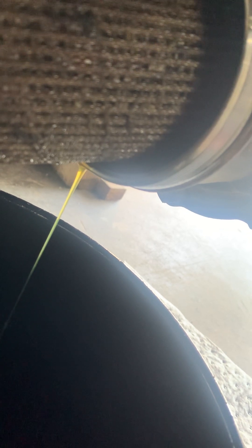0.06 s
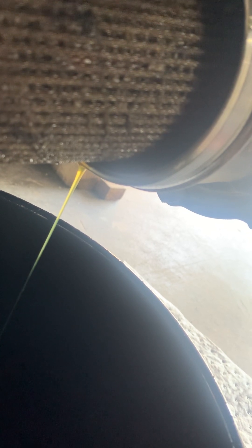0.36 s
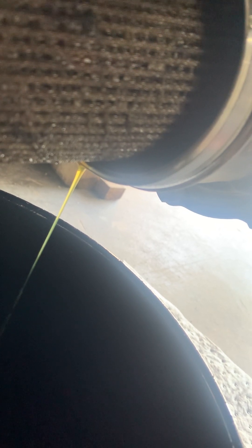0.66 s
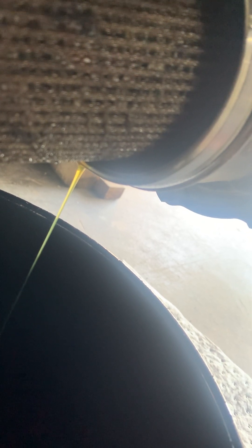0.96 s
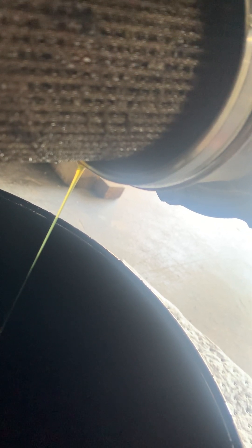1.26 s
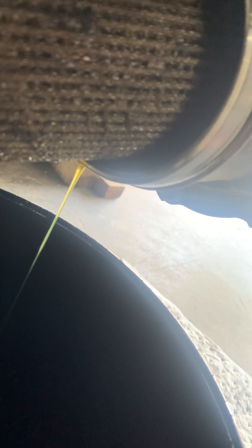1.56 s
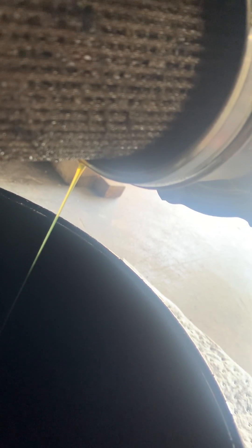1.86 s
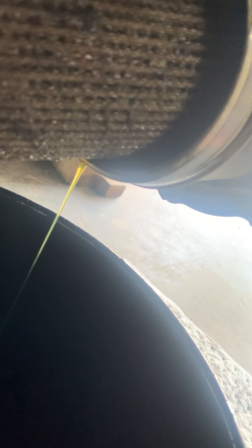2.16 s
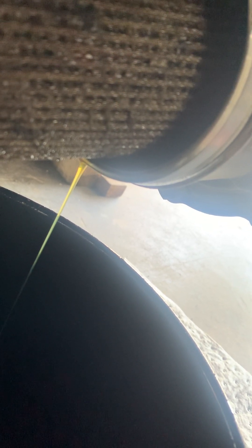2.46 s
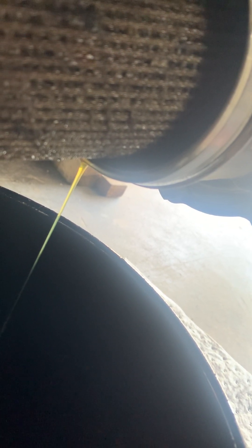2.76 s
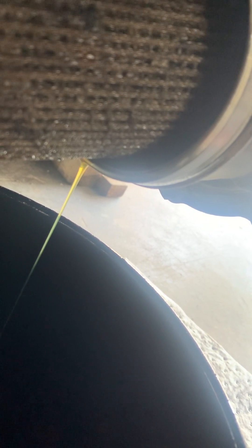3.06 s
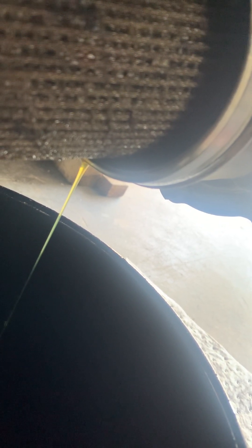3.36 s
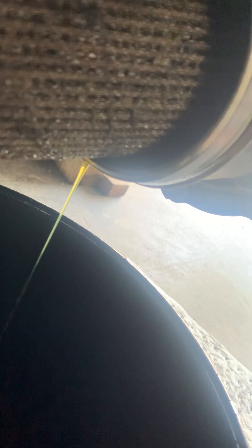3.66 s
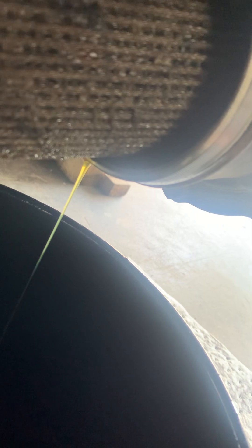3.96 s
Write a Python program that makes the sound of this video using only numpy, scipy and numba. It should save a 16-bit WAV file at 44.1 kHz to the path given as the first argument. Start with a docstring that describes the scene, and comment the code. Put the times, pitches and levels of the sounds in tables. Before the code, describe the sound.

Oil trickling into a part-filled pan with small bubbling blips, over a faint machine hum.

```python
"""At a part-filled plastic drain pan, microphone close, a machine humming in the distance.
A thin stream of oil falls in and traps air: bubbles blip in uneven clusters over a fine trickle,
now and then they gurgle, and froth pops on the surface. The hollow of the pan rings with all of it.
Early on comes a brief, dry, centred glitch: a blip falling in pitch over a low thump."""
import sys
import numpy as np
from scipy import signal
from scipy.fft import rfft, irfft
from scipy.io import wavfile
from scipy.ndimage import uniform_filter1d
from numba import njit

SR = 44100
rng = np.random.default_rng(int(sys.argv[2]) if len(sys.argv) > 2 else 0)


def generate_wav(sig):
    """Save sig (samples, or channels by samples) to the path in sys.argv[1] as 16-bit PCM at SR."""
    pcm = np.round(np.clip(np.atleast_2d(sig).T, -1, 1) * 32767).astype(np.int16)
    wavfile.write(sys.argv[1], SR, pcm)


N = 176400


def undb(db):
    """Decibels to gain."""
    return 10 ** (np.asarray(db) / 20)


def curve(table, column=1):
    """A column of a timed table, joined by straight lines."""
    rows = np.array(table)
    return np.interp(np.arange(N) / SR, rows[:, 0], rows[:, column])


def colour(x, points):
    """Filter by points of (frequency [Hz], gain [dB])."""
    hz, db = np.array(points).T
    f = np.maximum(np.fft.rfftfreq(2 * N, 1 / SR), 1)
    gain = undb(np.interp(np.log(f), np.log(hz), db))
    return irfft(rfft(x, 2 * N) * gain)[..., :N]


def walk(rate_hz):
    """Smooth random drift with a spread near 1."""
    hold = int(SR / rate_hz)
    steps = rng.standard_normal(400)[np.arange(N) // hold]
    return 1.3 * uniform_filter1d(uniform_filter1d(steps, hold), hold)


@njit
def grains(times, hz, gain, cycles, rise, swell):
    """Sines that build over `swell` cycles; over `cycles` they fade 60 dB and go sharp by `rise`."""
    out = np.zeros(N)
    for k in range(len(times)):
        f = min(hz[k], 15000.)
        start = int(times[k] * SR)
        for i in range(int(cycles * SR / f)):
            if 0 <= start + i < N:
                cycle = i * f / SR
                envelope = (1 - np.exp(-(cycle / swell) ** 2)) * np.exp(-6.9 * cycle / cycles)
                phase = 2 * np.pi * cycle * (1 + rise * cycle / cycles / 2)
                out[start + i] += gain[k] * envelope * np.sin(phase)
    return out


def blips(times, hz, db, cycles, swell, rise=0.033):
    """Damped, rising sines, the way pockets of air ring."""
    columns = np.broadcast_arrays(times, hz, undb(db))
    times, hz, gain = (np.array(column, float).ravel() for column in columns)
    return grains(times, hz, gain, float(cycles), float(rise), float(swell))


# how much the microphone's two ports differ (frequency [Hz], gain [dB])
PORT_DIFFERENCE = [(60, -46.5), (200, -62), (380, -37.5), (650, -15), (1100, 3), (4000, 4), (15000, -3)]
def stereo_side(x):
    """The difference between the ports: treble, a quarter cycle ahead, as the left port is nearer."""
    return -signal.hilbert(colour(x, PORT_DIFFERENCE)).imag


# spectrum of the far rumble (frequency [Hz], relative level [dB])
RUMBLE_SPECTRUM = [(20, -33), (33, -17.5), (48, 4.5), (60, -2.5), (85, 4.5), (110, 1.5), (145, -5.5),
                   (185, -0.5), (255, -1.5), (310, -16.5), (550, -17.5), (800, -21), (1700, -39.5),
                   (3000, -38.5), (7000, -45.5), (9000, -60), (11000, -48.5), (16000, -63.5)]
# tones of the hum (frequency [Hz], level offset [dB])
HUM_TONES = [(60.4, -3), (121, -11), (173, -6.5)]
# course of the lowest tone (time [s], level [dB])
LOW_HUM_LEVEL = [(0, -56.5), (1.2, -57), (2.3, -68), (2.5, -47.5), (3.3, -47.5), (4, -49.5)]
def machine():
    """Far off, a machine's hum wavers in a slowly growing rumble; gives mid and side."""
    rumble_db, growth_db_per_s = -54.5, 1.0
    waver, flutter_db, overtone_db = 0.0276, 2.2, -53.5
    t = np.arange(N) / SR
    rumble = colour(rng.standard_normal((2, N)), RUMBLE_SPECTRUM)
    rumble *= undb(rumble_db + growth_db_per_s * t) / np.std(rumble[0])
    hum = 0
    for k, (hz, offset_db) in enumerate(HUM_TONES):
        phase = 2 * np.pi * np.cumsum(hz * (1 + waver * walk(11))) / SR
        db = (overtone_db if k else curve(LOW_HUM_LEVEL)) + offset_db + flutter_db * walk(11)
        hum = hum + np.sqrt(2) * undb(db) * np.sin(phase)
    return rumble[0] + hum, stereo_side(rumble[1])


# strength of the stream where it lands (time [s], level [dB])
FLOW_LEVEL = [(0, -56.5), (.75, -57), (.95, -55), (1.33, -54.5), (1.58, -56.5), (1.9, -52.5), (2.03, -52),
              (2.3, -48.5), (2.55, -54.5), (3.1, -51.5), (3.3, -55.5), (3.6, -48.5), (4, -58.5)]
def trickle(count, centre_hz, spread_oct, offset_db, scatter_db, cycles):
    """Small bubbles ring throughout, their loudness following the flow."""
    t = (np.arange(count) + 3 * rng.random(count) - 1) / count * N / SR
    pitch, loudness = np.clip(rng.standard_normal((count, 2)).T, -2.2, 2.2)
    db = np.interp(t, *np.array(FLOW_LEVEL).T) + offset_db + scatter_db * loudness
    return blips(t, centre_hz * 2 ** (spread_oct * pitch), db, cycles, swell=cycles / 10)


# air trapped by the stream (time [s], relative level [dB], pitch [Hz], relative fizz level [dB])
TRAPPED_BUBBLES = [(0.0013, -43, 1960, -78), (0.0652, -33, 1460, -56), (0.0682, -35.5, 1455, -73),
                   (0.1257, -44, 2340, -99), (0.164, -43, 1335, -73), (0.2024, -36, 2350, -56),
                   (0.2447, -41, 1960, -71), (0.2836, -45.5, 1826, -61), (0.4201, -34, 1645, -53.0),
                   (0.4602, -39.5, 1840, -60), (0.508, -44, 1430, -75), (0.5397, -33, 1940, -68.0),
                   (0.551, -38, 1910, -71.0), (0.5634, -41, 1820, -63.0), (0.5837, -35.5, 2040, -58),
                   (0.623, -43, 2920, -50), (0.6713, -34, 1784, -47), (0.7381, -38.5, 1607, -62.5),
                   (0.8257, -48, 3300, -56.5), (0.8446, -43, 2050, -79), (0.8872, -43, 2850, -69),
                   (0.8973, -45, 1910.0, -60), (0.905, -44, 2960, -70), (0.9207, -41.5, 1940, -54),
                   (0.9333, -34, 2230, -49), (0.954, -56, 2950, -56.0), (0.9725, -32, 2700.0, -48.5),
                   (1.0026, -59, 2380, -53), (1.0134, -33.5, 1700, -65), (1.0246, -36.5, 1660, -48),
                   (1.0889, -34.5, 1675, -57.5), (1.157, -45, 2420, -82), (1.1713, -39.5, 1930.0, -54.5),
                   (1.218, -49, 3250, -53), (1.4, -39, 4470, -48.5), (1.4441, -34.5, 1390, -47),
                   (1.4773, -34.5, 1390.0, -52), (1.4984, -33.5, 1454, -72), (1.6308, -45, 3450, -51),
                   (1.6391, -40, 1960, -73), (1.6836, -40.5, 1580, -49.5), (1.7181, -36.5, 1400, -50.5),
                   (1.8284, -40, 1680, -44.5), (1.8569, -36, 1570, -50.5), (1.8792, -38, 1700, -50.5),
                   (1.919, -30, 1530, -54), (1.9468, -37, 1990, -76), (1.955, -37.5, 2280, -80),
                   (1.994, -39, 1770, -58), (2.0724, -36, 1830, -49), (2.0821, -33, 1700, -68),
                   (2.154, -37.5, 4440, -53), (2.2152, -39, 1890, -55), (2.233, -45, 1940, -49),
                   (2.2432, -46, 1800, -62), (2.2542, -31.5, 1470.0, -46), (2.3261, -33, 1835, -55),
                   (2.3573, -34, 1790, -54), (2.3685, -39, 1730, -48), (2.453, -39.5, 1420, -43),
                   (2.4989, -41.5, 1600.0, -54.5), (2.5147, -39, 2040, -54), (2.58, -37.5, 1500, -54),
                   (2.5929, -31.5, 3340, -54), (2.6314, -38.5, 1840, -53), (2.6884, -35.5, 1556, -53),
                   (2.7023, -47, 1600, -63), (2.706, -41, 3440, -70), (2.746, -38.5, 1940.0, -56),
                   (2.759, -35, 1860.0, -60), (2.77, -41.5, 4200, -47.5), (2.787, -44, 3640, -62),
                   (2.8324, -34.5, 1763, -62), (2.8893, -39.5, 1490, -53), (2.954, -40, 1400, -51),
                   (2.999, -40, 1940, -71), (3.0178, -36.5, 1570, -50), (3.0618, -41, 2010, -73),
                   (3.0794, -32, 1930, -53), (3.0888, -34.5, 2450, -68), (3.128, -39, 2150, -69),
                   (3.1461, -36.5, 2160, -73), (3.1783, -35.5, 1810, -49.5), (3.2292, -34.5, 1780, -67),
                   (3.2787, -40, 1445, -54), (3.3627, -42, 1640, -50.5), (3.3974, -39, 2090, -62),
                   (3.4353, -36.5, 1415, -47.5), (3.4808, -37, 3000, -54), (3.531, -43.5, 4050, -49.5),
                   (3.6146, -33.5, 1510, -46), (3.6401, -43, 1230, -71), (3.7129, -36.5, 1864, -58),
                   (3.7638, -36, 3850, -52), (3.7814, -44, 4050.0, -51), (3.8075, -44, 1390, -54),
                   (3.8429, -41, 1410, -47.5), (3.9063, -45, 3100, -52.0), (3.9383, -38, 1444, -48),
                   (3.97, -37.5, 1920, -51), (3.9805, -40.5, 1940, -59)]
def bubbles():
    """Close up, each trapped bubble rings briefly amid three fainter ones and a little fizz."""
    rise, cluster_s, fizz_s, fizz_hz = 0.04, 0.011, 0.0073, 4320
    t, db, hz, fizz_db = np.array(TRAPPED_BUBBLES).T[:, :, None]
    main = blips(t, hz * (1 - rise / 4), db + 4, cycles=18.4, swell=2.37, rise=rise)
    when, pitch, loudness = rng.uniform(-1.5, 1.5, (len(t), 3, 3)).transpose(2, 0, 1)
    cluster = blips(t + cluster_s * (when + .5), hz * 2 ** (0.26 * pitch),
                    db - 10 + 2 * loudness, cycles=17, swell=1.17)
    when, pitch, loudness = rng.uniform(-1.5, 1.5, (len(t), 14, 3)).transpose(2, 0, 1)
    fizz = blips(t + fizz_s * (when + .5), fizz_hz * 2 ** (.55 * pitch),
                 fizz_db + 4 + 2 * loudness, cycles=12.96, swell=1.94)
    return main + cluster + fizz


# resonances of the hollow (frequency [Hz], bandwidth [Hz], mid gain [dB], side gain [dB])
HOLLOW_MODES = [(380, 14, -5, -28), (479, 17, -26, -25), (580, 22, 11, -21.5), (837, 60, 5.5, -21),
                (928, 57, -4, -3), (989, 25, 12, -18), (1070, 68, -7, -12), (1276, 22, 9, 14),
                (1381, 25, 9, 9.5), (1670, 67, -12.5, 5.5), (1673, 27, 5, -2), (1728, 92, 5, -2),
                (1957, 84, -3, -21), (2276, 49, 6, 4), (2780, 40, -1, 0), (3064, 32, -1, 0),
                (3510, 120, -8, 5), (3970, 175, 3, -3), (4480, 68, -5, -4), (5744, 114, 7.5, -21),
                (6814, 200, 6, -9)]
# tone of the reflections off the plastic walls (frequency [Hz], gain [dB])
WALL_TONE = [(900, 4), (1400, 0.5), (2000, -5.5), (4000, 4.5), (12000, 5)]
def pan(oil):
    """The oil arrives directly, through the ringing hollow and off the walls; gives mid and side."""
    direct_db, walls_db, walls_t60_s = -10.5, -5.5, 0.057
    mid, side = undb(direct_db) * oil, undb(-4.5) * stereo_side(oil)
    for hz, width_hz, mid_db, side_db in HOLLOW_MODES:
        mode = signal.lfilter(*signal.iirpeak(hz, hz / width_hz, fs=SR), oil)
        mid += undb(mid_db) * mode
        side += undb(side_db) * np.gradient(mode) * SR / (2 * np.pi * hz)  # a quarter cycle ahead
    t = np.arange(SR // 5) / SR
    tails = rng.standard_normal((2, len(t))) * undb(-60 * t / walls_t60_s)
    tails *= undb(walls_db) / np.sqrt(np.sum(tails[0] ** 2))
    reflections = signal.fftconvolve(colour(oil, WALL_TONE)[None], tails, axes=1)[:, :N]
    return mid + reflections[0], side + stereo_side(reflections[1])


# the stream churning the pool (middle time [s], length [s], relative level [dB])
CHURNS = [(0.071, .04, -50), (0.426, .03, -48), (0.667, .05, -48), (0.943, .05, -46), (1.019, .05, -49),
          (1.083, .03, -47.5), (1.479, .08, -45.5), (1.704, .05, -52), (1.862, .04, -47), (1.919, .03, -52),
          (2.268, .05, -43.5), (2.362, .08, -50), (2.605, .05, -49.5), (2.895, .04, -51), (2.962, .04, -50),
          (3.037, .07, -36.5), (3.225, .03, -48.5), (3.445, .06, -55.5), (3.629, .07, -35.5),
          (3.803, .06, -49.5), (3.954, .07, -49.5)]
def gurgles():
    """Swarms of larger, quickly damped bubbles; the few largest thud."""
    swarm_hz, spread_oct, thud_hz = 972, 1.46, 261
    t, length, db = np.array(CHURNS).T[:, :, None]
    when, pitch, loudness = rng.uniform(-1, 1, (len(t), 40, 3)).transpose(2, 0, 1)
    swarm_db = db - 1.5 + 5 * loudness - 6 * when ** 2  # loudest in the middle
    swarm = blips(t + length * when / 2, swarm_hz * 2 ** (spread_oct * pitch), swarm_db,
                  cycles=6.44, swell=0.49)
    when, pitch = rng.uniform(-1, 1, (len(t), 4, 2)).transpose(2, 0, 1)
    thuds = blips(t + length * when / 2, thud_hz * 2 ** pitch, db - 14.5, cycles=5.8, swell=1)
    return swarm + thuds


# glide of the glitch's blip (time [s], pitch [Hz], level [dB])
GLITCH_GLIDE = [(.347, 1346, -36), (.3505, 1390, -61), (.3518, 1480, -34), (.3535, 1260, -34),
                (.3555, 700, -41), (.357, 900, -27.5), (.3585, 770, -28), (.3595, 895, -65),
                (.362, 1100, -53)]
def glitch():
    """A faint tick, then a brief, dry, centred glitch: a blip falling in pitch over a low thump."""
    t = np.arange(N) / SR
    tick = blips(times=0.17, hz=3660, db=-39, cycles=14, swell=1.3)
    phase = 2 * np.pi * np.cumsum(curve(GLITCH_GLIDE)) / SR
    sounding = (t > GLITCH_GLIDE[0][0]) & (t < GLITCH_GLIDE[-1][0])
    tone = np.sin(phase) * undb(curve(GLITCH_GLIDE, column=2)) * sounding
    thump = blips(times=.3535, hz=408, db=-25.5, cycles=8.5, swell=0.54)
    return tick + tone + thump


# froth bursting on the surface (time [s], relative level [dB], pitch [Hz])
FROTH_POPS = [(.2393, -42.5, 8100), (0.2833, -44.5, 7340), (0.413, -43.5, 7400), (0.46, -56, 7560),
              (0.622, -54, 7050), (.631, -34.5, 6820), (.664, -43.5, 6300), (0.752, -48, 9800),
              (0.8736, -49, 6300), (0.9339, -45.5, 3940), (.997, -49, 6700), (1.036, -46.5, 6370),
              (1.1698, -46, 7200), (1.249, -36, 9350), (1.264, -36.5, 12200), (1.346, -40, 6900),
              (1.4724, -51, 12000), (1.4927, -45, 6050), (1.5126, -43, 5400), (1.683, -47, 4220),
              (2.216, -57, 13000), (2.2331, -32.5, 5070), (2.326, -44.5, 5940), (2.372, -43.5, 4100),
              (2.3745, -40, 6300), (2.452, -47.5, 11800), (2.6589, -40.5, 5550), (2.834, -46.5, 6900),
              (2.946, -45, 6400), (2.966, -44, 9700), (3.1999, -41.5, 6200), (3.269, -54, 6100),
              (3.3623, -48, 10400), (3.482, -49.5, 9700), (3.592, -46, 4370), (3.609, -47, 11600),
              (3.8434, -47.5, 5240)]
def pops():
    """A bursting film snaps, and its tiny cavity rings."""
    t, db, hz = np.array(FROTH_POPS).T
    snap = blips(t, hz, db + 10.5, cycles=4.5, swell=0.55)
    cavity = blips(t, hz, db + 5.5, cycles=17.6, swell=1.05)
    return snap + cavity


def scene():
    """Oil in the pan up close, the machine far behind it; gives left and right."""
    oil = bubbles() + pops() + gurgles()
    stream = trickle(count=800, centre_hz=1720, spread_oct=0.362, offset_db=2.5, scatter_db=3, cycles=17)
    froth = trickle(count=1400, centre_hz=6400, spread_oct=0.35, offset_db=-14, scatter_db=10.5,
                    cycles=11)
    spits = trickle(count=50, centre_hz=9300, spread_oct=0.64, offset_db=4.5, scatter_db=1, cycles=18)
    near_mid, near_side = pan(oil + stream + froth + spits)
    far_mid, far_side = machine()
    mid, side = near_mid + far_mid + glitch(), near_side + far_side
    return np.array([mid + side, mid - side])


# overall treble colour (frequency [Hz], gain [dB])
TREBLE_COLOUR = [(100, 0), (1000, 0), (2000, 8.5), (3500, 3.5), (5000, 1), (7200, -4.5), (8100, -5.5),
                 (8900, -17), (10000, 0.5), (12000, 1), (13200, -30), (14800, 12), (16000, -81)]
def record(dry):
    """A presence lift, two narrow notches and a bright peak near 15 kHz; above that the top is cut."""
    top_hz = 15900
    lowpass = signal.ellip(8, .2, 70, top_hz, fs=SR, output="sos")
    return signal.sosfilt(lowpass, colour(dry, TREBLE_COLOUR))


dry = scene()
out = record(dry)
generate_wav(out)
```